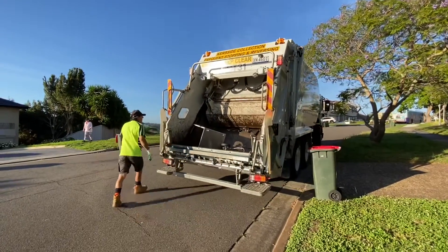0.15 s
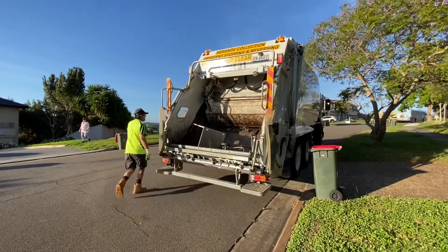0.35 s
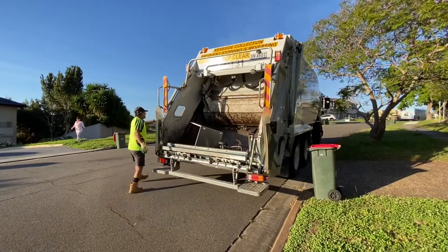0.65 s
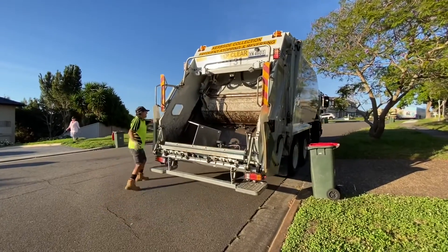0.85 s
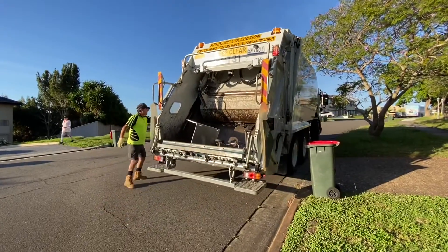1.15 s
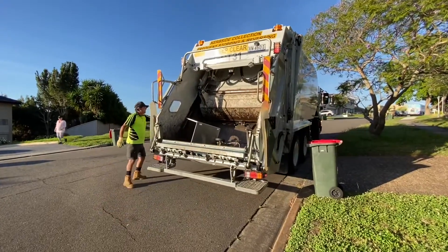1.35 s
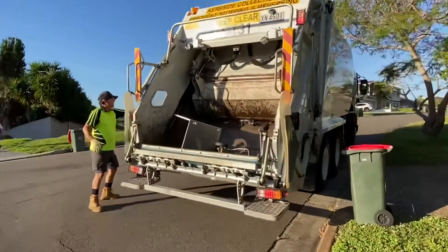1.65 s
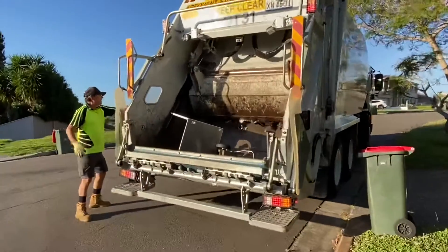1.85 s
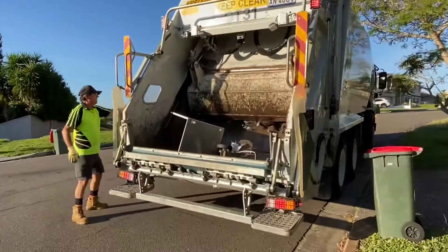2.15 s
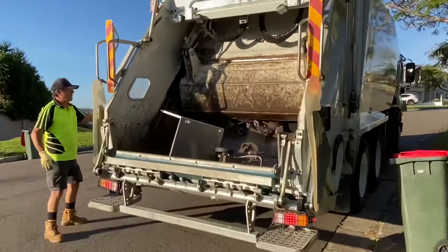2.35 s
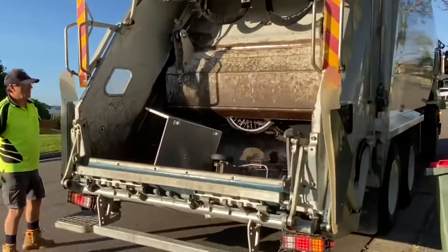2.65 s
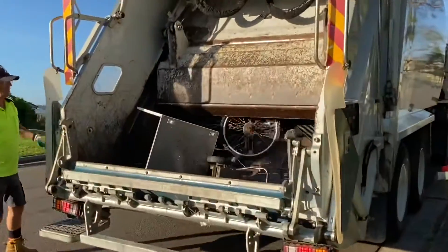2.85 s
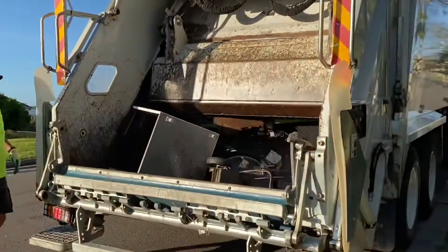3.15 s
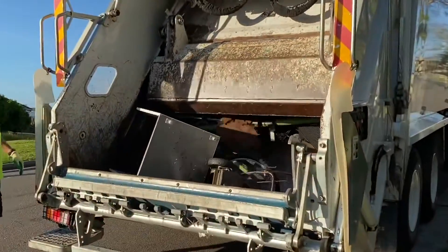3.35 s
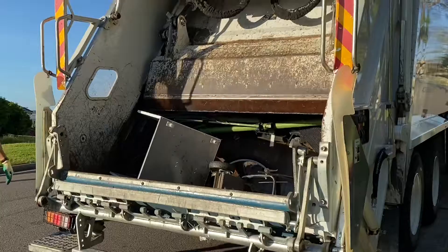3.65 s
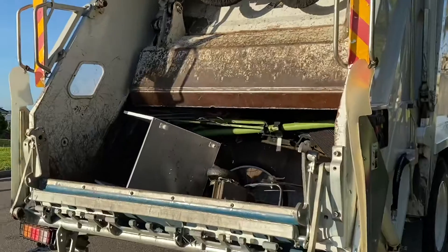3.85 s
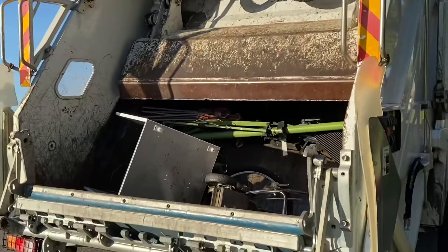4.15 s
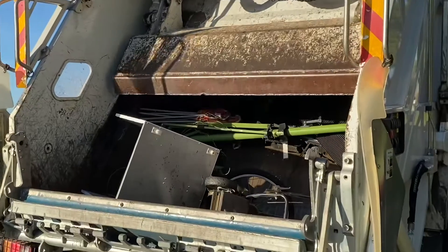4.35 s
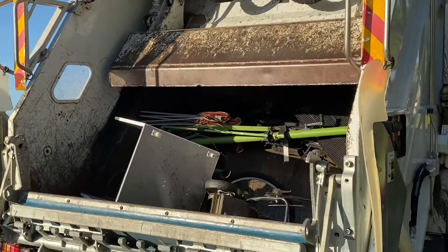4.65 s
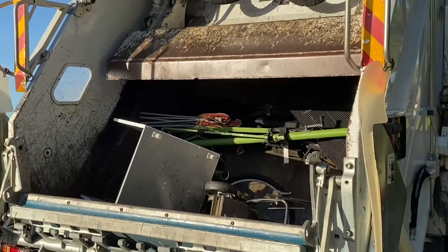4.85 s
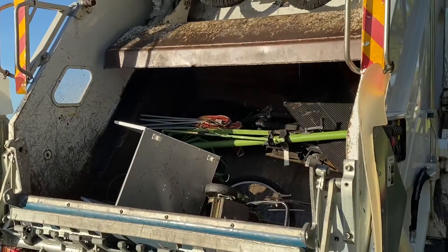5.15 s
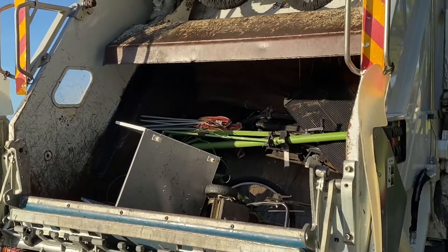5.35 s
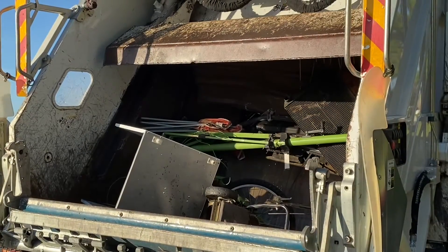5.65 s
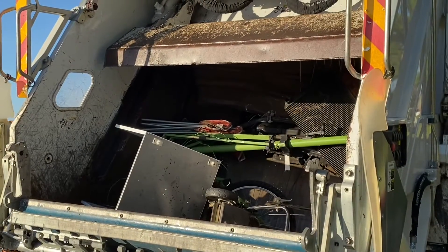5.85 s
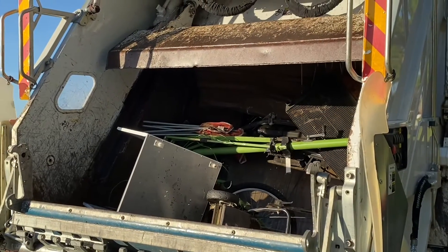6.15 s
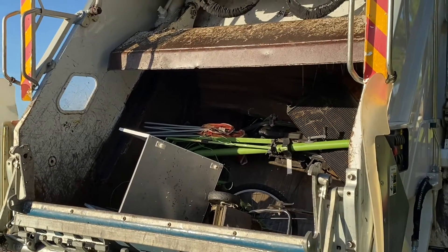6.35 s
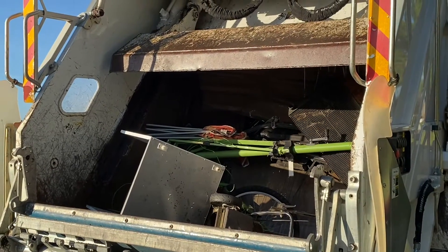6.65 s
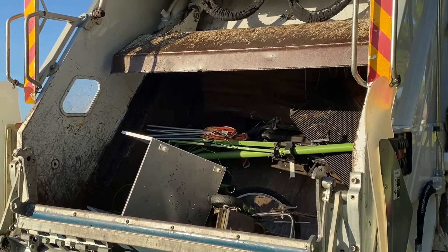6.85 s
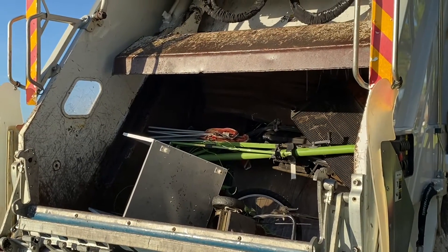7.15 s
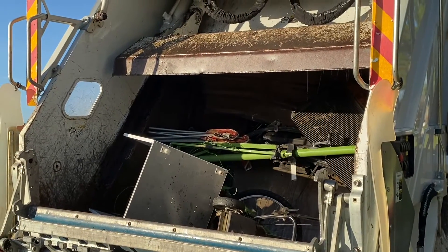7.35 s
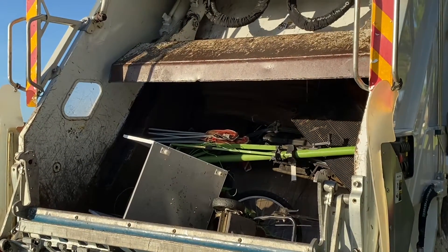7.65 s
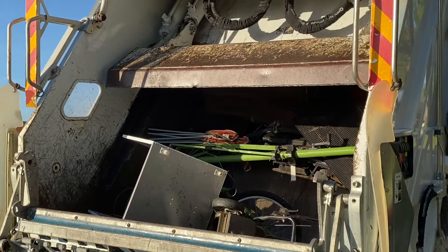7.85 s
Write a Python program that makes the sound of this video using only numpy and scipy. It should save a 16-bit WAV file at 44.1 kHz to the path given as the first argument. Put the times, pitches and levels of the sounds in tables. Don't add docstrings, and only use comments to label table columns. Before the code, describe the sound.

A refuse truck idles at the kerb, its hydraulics load up, and scrap crashes, clangs and rattles in the steel hopper before easing to whine and hiss.

```python
import sys
import numpy as np
from scipy import signal
from scipy.fft import rfft, irfft
from scipy.io import wavfile
from scipy.ndimage import uniform_filter1d

SR = 44100
rng = np.random.default_rng(int(sys.argv[2]) if len(sys.argv) > 2 else 0)


def wav_out(sig):
    wavfile.write(sys.argv[1], SR, np.round(np.clip(np.atleast_2d(sig).T, -1, 1) * 32767).astype(np.int16))


def gain_from_db(level_db):
    decades = np.asarray(level_db, float) / 20
    return 10 ** decades


N = 352800


def in_time(rows):
    s, *columns = np.transpose(rows)
    return [np.interp(np.arange(N) / SR, s, c) for c in columns]


def rms_one(x):
    return x / np.sqrt(np.mean(x ** 2) + 1e-20)


def shaped(x, points, gain=gain_from_db):
    hz, value = np.transpose(points)
    bins = np.arange(1, len(x) // 2 + 2) * SR / len(x)
    curve = np.interp(np.log(bins), np.log(hz), value, left=value[0], right=value[-1])
    return irfft(rfft(x) * gain(curve), len(x))


def band(x, low_hz, high_hz, order=2):
    return signal.sosfilt(signal.butter(order, [low_hz, high_hz], "band", fs=SR, output="sos"), x)


def drift(rate_hz):
    steps = rng.standard_normal(8 * 60 + 3)
    return np.interp(np.arange(N) / SR * min(rate_hz, 60), np.arange(len(steps)), steps) * 1.2


def resonate(x, hz, width_hz):
    r = np.exp(-np.pi * width_hz / SR)
    feedback = [1, -2 * r * np.cos(2 * np.pi * hz / SR), r * r]
    return signal.lfilter(np.array([1, 0, -1]) * (1 - r * r) / 2, feedback, x + 1e-18)


def grains(per_s, spread_db):
    chance = rng.random(N) * SR / per_s
    hit, clicks = chance < 1, np.zeros(N)
    size, sign = np.modf(2 * chance[hit])
    clicks[hit] = gain_from_db(spread_db * np.minimum(-np.log(size + 1e-9), 3.5)) * (2 * sign - 1)
    return rms_one(clicks)


def swell(rise_s, t60_s, size):
    t = np.arange(size) / SR
    return np.minimum(t / rise_s, 1) * gain_from_db(-60 * np.maximum(t - rise_s, 0) / max(t60_s, .02))


def held(start, length, db, rise_s, fall_s):
    t = np.arange(0, N + 64, 64)[:, None] / SR
    early, late = np.maximum(start - t, 0), np.maximum(t - start - length, 0)
    shape = db - 20 * (early / rise_s + late / fall_s)
    total_db = 10 * np.log10(np.sum(gain_from_db(2 * shape), axis=1) + 1e-12)
    return np.interp(np.arange(N) / SR, t[:, 0], total_db)


def add(out, s, x):
    at = round(s * SR)
    out[at:at + len(x)] += x[:len(out) - at]


# t/s, firings per s
SPEED = [(0, 51.15), (1.35, 51.1), (1.6, 43.6), (3.3, 43.1), (5.22, 43.1), (5.4, 44.4), (5.78, 46.2),
         (6.1, 46.4), (7.4, 46.4), (7.65, 43.8), (8, 43.3)]
# t/s, level/dB
EXHAUST = [(0, -41), (1.23, -41), (1.43, -38), (1.56, -44), (1.7, -32), (2.27, -32.5), (2.96, -38),
           (3.88, -39), (4.01, -33.5), (5.28, -33), (5.48, -32.5), (5.61, -41), (5.75, -37), (6.73, -39),
           (7.35, -35), (7.46, -42.5), (7.64, -39), (7.82, -28.5)]
# multiple of firing, level/dB re firing tone
FIRING_ORDERS = [(1.55, -9), (2, -14), (3.331, -18)]
# t/s, level/dB
PUMP = [(0, -51), (1.2, -58), (1.5, -84), (2.4, -39), (3.3, -39), (3.8, -33), (4.6, -31.5), (5.25, -30),
        (5.45, -41.5), (5.6, -48), (5.85, -41.5), (6.4, -47.5), (7.35, -47.5), (7.62, -33), (7.8, -28)]
# t/s, level/dB
NEAR = [(0, -67), (1.5, -62), (3.5, -61), (4.8, -47.5), (5.7, -49.5), (7.5, -44), (7.8, -38)]
# multiple of firing, level/dB re octave line
PUMP_ORDERS = [(12, -12.5), (16, -8)]
# t/s, level/dB
IDLE_LINE = [(0, -50.5), (1.1, -51), (1.5, -62), (8, -91.5)]
# start t/s, length/s, level/dB, multiple of firing
GEAR_LINES = [(4.0, 1.2, -61, 84.5), (4.0, 1.2, -59, 87.0), (3.97, 1.25, -58, 89.3), (4.8, .2, -64, 96.0),
              (4.7, 0.56, -55.5, 16.0), (5.4, 0.22, -58, 32.2), (5.32, 0.26, -62, 57.0),
              (5.75, 1.6, -68, 57.0), (5.9, .45, -67, 48.0), (6.1, 1.4, -55.5, 6.0)]
# f/Hz, width/Hz, level/dB
BODY = [(69.5, 14, 16), (83, 21.6, 17), (100, 25, -18.5)]
# start t/s, length/s, chassis throb level/dB, scrap clang offset/dB
STROKES = [
    (1.555, 1.46, -29, 0.5),
    (7.43, .6, -33, -6.5),
]


def engine():
    (rate,), (tone_db,) = in_time(SPEED), in_time(EXHAUST)
    (pump_db,), (octave_db,), (idle_db,) = in_time(PUMP), in_time(NEAR), in_time(IDLE_LINE)
    turns = np.cumsum(rate * (1 + .002 * drift(7))) / SR

    def line(multiple, db, flutter_db):
        level = np.sqrt(2) * gain_from_db(db + flutter_db * drift(14))
        return level * np.sin(2 * np.pi * (multiple * turns + rng.random()))

    out = line(1, tone_db, 1.2) + line(6, idle_db, 2.2)
    out += sum(line(k, tone_db + db, 4.76) for k, db in FIRING_ORDERS)
    out += line(4, pump_db, 0.32) + line(8, octave_db, 1.9)
    out += sum(line(k, octave_db + db, 2.2) for k, db in PUMP_ORDERS)
    for s, length, db, k in GEAR_LINES:
        out += line(k, held(s, length, db, 0.15, 0.19), 1.8)

    start, length, throb_db, _ = np.transpose(STROKES)
    idle_throb_db, rise_s, fall_s = -42.5, 0.071, 0.62
    shake = np.hypot(gain_from_db(idle_throb_db), gain_from_db(held(start, length, throb_db, rise_s, fall_s)))
    kicks = np.diff(np.floor(turns), prepend=0) * rng.standard_normal(N)
    throb = band(sum(gain_from_db(db) * resonate(kicks, hz, w) for hz, w, db in BODY), 48.0, 163)
    return out + shake * rms_one(throb)


# start t/s, length/s, then level/dB of heavy parts, light parts, fine grit
SLIDES = [(1.575, 0.067, -17.5, -28, -45.5), (1.71, 0.059, -26, -38, -62), (1.784, 0.2, -22.5, -25, -44),
          (2.036, 0.14, -19, -25, -47.5), (2.221, 0.066, -19, -19, -34.5), (2.315, 0.019, -23.5, -19, -30),
          (2.373, 0.04, -17.5, -22, -52), (2.498, 0.07, -18.5, -16, -36.5), (2.592, 0.035, -16.5, -14, -37),
          (2.659, 0.016, -12, -35, -58), (2.699, 0.033, -17.5, -16.5, -35.5),
          (2.738, 0.096, -20, -17.5, -42), (2.849, 0.014, -21.5, -13, -38), (2.877, 0.013, -15, -15.5, -46),
          (3.016, 0.072, -14.5, -15.5, -46), (3.133, 0.1, -22.5, -17.5, -44),
          (3.223, 0.022, -26, -18.5, -42), (3.526, 0.031, -46, -31, -46.5), (7.43, .015, -19.5, -29, -61),
          (7.446, 0.024, -21, -24, -47.5), (7.553, 0.13, -31, -36, -65), (7.676, 0.064, -27.5, -43, -68),
          (7.79, 0.086, -27.5, -42, -62), (7.946, .07, -29, -41.5, -60)]
# f/Hz, width/Hz, level/dB
HOPPER = [(140.6, 8.5, -0.5), (172, 6.1, -2.5), (208, 7.4, -3.5), (235.5, 11.6, 0.5), (277.3, 12.5, 2),
          (305, 35, 2), (348, 35, 3.5), (380, 24, -2.5), (435, 41, 3.5), (465, 16.3, -4.5), (510, 49, 2),
          (567, 34, -3)]
# f/Hz, width/Hz, level/dB
RIBS = [(676, 65, 0), (730, 89, 1.5), (809, 77, 5.5), (900, 91, 3.5), (965, 16, -1), (1066, 89, 3),
        (1206, 92, 0), (1302, 33, -3), (1520, 140, -16.5)]
# f/Hz, level/dB per Hz
SCRAP = [(1300, 0.5), (1800, -1.5), (3000, -1.5), (4500, -4.5), (6000, -10), (8000, -12.5), (9500, -30)]


def tumbling_scrap():
    start, length, heavy_db, light_db, fine_db = np.transpose(SLIDES)
    rise_s = 0.02
    boom_db = held(start, length, heavy_db, rise_s, 0.2)
    rattle_db = held(start, length, light_db, rise_s, 0.16)
    grit_db = held(start, length, fine_db, rise_s, .1)
    dull_db, = in_time([(s + end, db) for s, span, _, db in STROKES for end in (0, span)])
    clang_db = -26.5 + 0.55 * (boom_db + 19) + 0.25 * (rattle_db + 19.0) + dull_db

    def ring(modes, per_s, widen):
        return rms_one(sum(gain_from_db(db) * resonate(grains(per_s, 3.43), hz, widen * w) / np.sqrt(w)
                           for hz, w, db in modes))

    boom = band(ring(HOPPER, 200, 1.0), 64, 735)
    clang = band(ring(RIBS, 250, 0.96), 530, 3700)
    clumps = gain_from_db(3.1 * drift(45))
    pings = sum(gain_from_db(2.2 * drift(25)) * resonate(grains(300, 2.8), hz, hz / 30)
                for hz in np.geomspace(1400, 7400, 24))
    clatter = grains(1600, 4.4) * clumps + 0.72 * rms_one(pings)
    rattle = rms_one(shaped(clatter, [(600, -44)] + SCRAP))
    grit = rms_one(band(grains(2000, 3.2) * clumps, 7500, 15500, order=4))
    out = gain_from_db(boom_db - 3.5) * boom + gain_from_db(clang_db) * clang
    return out + gain_from_db(rattle_db - 7.5) * rattle + gain_from_db(grit_db + 6) * grit


# t/s, peak level/dB, struck part f/Hz, thud level/dB re blow
BLOWS = [(0.286, -41.5, 4740, -10), (1.3273, -46, 2930, 5), (1.563, -30, 6500, -6), (1.629, -20.5, 2450, 0),
         (1.8325, -23, 2330, -16), (2.218, -26, 2250, 3), (2.3226, -8, 3330, -19), (2.341, -6, 2960, -2.5),
         (2.376, -11.5, 3450, 0), (2.4957, -9.5, 3620, 0.5), (2.61, -11, 2920, -3.5),
         (2.692, -13, 2510, -18), (2.81, -9, 3470, -9), (2.844, -15, 4000, -6), (2.8738, -8.5, 2310, -31),
         (3.021, -10, 3230, 3.5), (3.064, -14.5, 2300, 11), (3.1046, -10.5, 3100, -1),
         (3.19, -10.5, 4880, -23), (3.2614, -8.5, 3320, -1), (3.53, -22, 3400, -5), (3.783, -20, 2800, -4),
         (4.08, -36, 4140, 3), (4.627, -23, 3460, -17), (4.633, -5, 4050, -6.5), (4.7693, -26.5, 2380, -6),
         (5.437, -45, 3480, -22), (7.376, -36.5, 2290, -18), (7.42, -11.5, 3500, -12),
         (7.538, -24, 3260, -18)]


def blows():
    out, size = np.zeros(N), SR // 4
    t = np.arange(size) / SR
    for (s, db, hz, thud_db), seed in zip(BLOWS, rng.standard_normal((len(BLOWS), 4, size))):
        dulling_db = 13 * (s > STROKES[-1][0] - .1)
        colour = [(1000, -30), (hz / 1.63, -8), (hz, 0), (hz * 1.3, -7),
                  (9000, -13.0 - dulling_db), (10500, -50)]
        crack = rms_one(shaped(seed[0] ** 3, colour))
        spread = np.clip(seed[2, :16], -2, 1.2)
        rings = sum(np.sin(2 * np.pi * (hz * 1.4 ** z * t + z * 9)) for z in spread) / np.sqrt(8)
        thud = rms_one(band(seed[1], 540, 1320))
        edge = rms_one(band(seed[3] ** 3, 4000, 14400, order=4))
        blow = crack + 0.27 * rings + gain_from_db(thud_db) * thud + gain_from_db(-8.5 - dulling_db) * edge
        add(out, s, gain_from_db(db - 11) * swell(0.0042, 0.18, size) * blow)
    return out


# t/s, level/dB, f/Hz
PLATE_KNOCKS = [(1.561, -22, 259), (1.574, -18.5, 334), (1.621, -21, 279), (1.665, -17, 365),
                (1.673, -16, 443), (1.721, -23, 318), (1.896, -22.5, 380), (1.901, -23.5, 280),
                (1.991, -23.5, 360), (2.046, -20.5, 331), (2.081, -20.5, 343), (2.137, -21.5, 450),
                (2.139, -23.5, 280), (2.229, -16.5, 466.6), (2.235, -14, 356), (2.285, -20, 335),
                (2.349, -20.5, 410), (2.393, -13, 338), (2.396, -17, 219), (2.461, -21, 322),
                (2.494, -13, 349), (2.514, -21, 255), (2.534, -19, 355), (2.57, -19, 380),
                (2.575, -22, 204), (2.618, -17, 371), (2.631, -17, 194), (2.658, -16.5, 456),
                (2.666, -13.5, 222), (2.691, -10, 224), (2.764, -17.5, 228), (2.783, -25.5, 361),
                (2.814, -20, 225), (2.889, -11.5, 312), (2.904, -11.5, 205), (2.966, -20.5, 369),
                (2.975, -21, 237), (3.016, -22, 310), (3.018, -19, 419), (3.044, -20.5, 354),
                (3.071, -22, 333), (3.075, -18.5, 207), (3.123, -23, 352), (3.126, -24.5, 185),
                (3.159, -26, 195), (3.178, -21.5, 337), (3.195, -22.5, 214), (3.223, -21, 307),
                (3.271, -22, 308), (7.44, -18.5, 227), (7.443, -19, 322), (7.562, -22.5, 247),
                (7.676, -25.5, 163), (7.746, -31, 172), (7.754, -23.5, 366), (7.823, -23.5, 348),
                (7.865, -25.5, 361), (7.908, -29, 172), (7.91, -31, 345), (7.958, -27.5, 358)]
# t/s, level/dB, f/Hz
RIB_KNOCKS = [(1.582, -23.5, 887), (1.829, -28, 842), (1.836, -29, 693), (1.884, -27, 896),
              (1.894, -31, 741), (2.015, -35, 848), (2.131, -23, 923), (2.134, -27, 754),
              (2.138, -25, 1115), (2.218, -25, 574), (2.262, -32, 1330), (2.263, -25, 947),
              (2.372, -27, 864), (2.413, -30, 748), (2.494, -19.5, 830), (2.498, -28, 1334),
              (2.549, -23, 947), (2.556, -22, 520), (2.568, -22, 1050), (2.627, -22.5, 814),
              (2.652, -23, 585), (2.669, -26, 770), (2.762, -25.5, 830), (2.865, -33, 772),
              (2.878, -26, 689), (3.016, -24.5, 805), (3.024, -23, 574), (3.025, -21, 682),
              (3.058, -23, 1580), (3.058, -24, 943), (3.061, -26, 1373), (3.061, -24, 1072),
              (3.14, -20.5, 652), (3.186, -28, 1020), (3.246, -26.5, 653), (3.27, -25, 736),
              (3.571, -38.5, 620), (3.787, -40, 704), (7.44, -31.5, 787), (1.559, -31, 950)]
# t/s, level/dB, f/Hz
PINGS = [(2.318, -26, 6700), (2.321, -26, 3780), (2.337, -21, 2464), (2.338, -24, 3060),
         (2.34, -18.5, 1715), (2.34, -24, 4080), (2.353, -24, 3290), (2.494, -25, 3610), (2.496, -28, 4113),
         (2.499, -27, 2530), (2.505, -31, 5340), (2.509, -29, 3220), (2.605, -21.5, 2885),
         (2.606, -26, 5954), (2.61, -27, 3456), (2.618, -23, 4470), (2.621, -26, 1852), (2.688, -29, 7300),
         (2.698, -26, 2500), (2.763, -26, 1760), (2.808, -29, 3440), (2.811, -30, 4587), (2.822, -29, 7483),
         (2.868, -22, 2562), (2.869, -20, 3898), (2.871, -24, 2960), (2.871, -18, 2300), (2.873, -25, 3390),
         (3.017, -31, 4240), (3.02, -32, 2310), (3.019, -31, 3300), (3.058, -25, 2960), (3.062, -21, 2410),
         (3.1, -23.5, 4160), (3.189, -27, 4867), (3.225, -25, 5150), (3.258, -23, 3330), (3.26, -30, 5100),
         (3.26, -28, 6406), (3.26, -24, 3000), (3.261, -26, 4264), (3.273, -28, 3736), (3.274, -26, 2390),
         (3.512, -34, 3350), (3.784, -36, 2870), (3.783, -36, 2400), (7.422, -37, 4530), (7.422, -32, 3630),
         (7.439, -33, 4231)]
# gain/dB, rise/s, t60/s
KNOCK_RULES = [
    (4.0, 0.00564, 0.13),
    (4, 0.005306, 0.16),
    (5.5, 0.002003, 0.06),
]


def knocks():
    out, size = np.zeros(N), SR // 3
    t = np.arange(size) / SR
    for rows, (gain_db, rise_s, t60_s) in zip((PLATE_KNOCKS, RIB_KNOCKS, PINGS), KNOCK_RULES):
        for (s, db, hz), z in zip(rows, rng.standard_normal((len(rows), 2))):
            twin_hz = hz * (1 + 0.0505 * z[0])
            tone = np.sin(2 * np.pi * hz * t) + 0.52 * np.sin(2 * np.pi * twin_hz * t + 9 * z[1])
            add(out, s + .0048 - rise_s, gain_from_db(db + gain_db) * swell(rise_s, t60_s, size) * tone)
    return out


# f/Hz, level/dB, t60/s
BAR_MODES = [(870, -4, 0.25), (1118, -4, 0.12), (2450, -9, 0.21), (2638, -12, 0.11), (3240, 2.5, 0.15),
             (3760, 2, 0.077), (4340, 2, 0.091), (4130, -6, 0.16), (5320, -4, 0.12), (6060, -2, 0.1),
             (6514, -17, 0.21), (6940, -3, 0.095), (6993, -8, 0.11), (7720, -26, 0.32)]


def dropped_bar():
    out, size = np.zeros(N), SR // 3
    drop_s, drop_db = 4.636, -23
    t = np.arange(size) / SR
    for (hz, db, t60_s), phase in zip(BAR_MODES, rng.random(len(BAR_MODES))):
        tone = np.sin(2 * np.pi * (hz * t + phase))
        add(out, drop_s, gain_from_db(drop_db + db) * swell(0.0034, t60_s, size) * tone)
    return out


# t/s, peak level/dB, f/Hz, second mode f/Hz, t60/s
BOOMS = [
    (2.496, -6, 142.5, 345, 0.081),
    (3.549, -20.5, 172, 312, 0.26),
    (4.636, -13, 172, 333, 0.051),
    (7.489, -11.5, 182, 431, 0.24),
]
# t/s, level/dB, f/Hz, rise/s, t60/s
SHUDDERS = [
    (1.42, -19, 80.0, 0.125, 0.25),
    (1.57, -21, 100, 0.03, 0.25),
    (5.521, -29, 60.5, 0.023, 0.11),
    (7.471, -11.5, 59.6, 0.015, 0.3),
    (7.563, -13, 66, 0.012, 0.09),
]


def heavy_steel():
    out, t = np.zeros(N), np.arange(SR) / SR
    for s, db, hz, upper_hz, t60_s in BOOMS:
        tone = np.sin(2 * np.pi * hz * t) + 0.84 * np.sin(2 * np.pi * upper_hz * t)
        add(out, s, gain_from_db(db - 10.0) * swell(0.0013, t60_s, SR) * tone)
    stiffen = 0.32
    for s, db, hz, rise_s, t60_s in SHUDDERS:
        bent_t = t - rise_s * stiffen * (1 - np.exp(-t / rise_s))
        add(out, s, gain_from_db(db) * swell(rise_s, t60_s, SR) * np.sin(2 * np.pi * hz * bent_t))
    return out


# t/s, level/dB
FLOW = [(0, -64), (1.3, -65.5), (1.55, -57.5), (1.62, -40), (3.3, -38), (3.6, -41.5), (3.9, -44.5),
        (4.3, -47.5), (4.8, -47), (5.2, -48.5), (5.35, -53.5), (5.55, -60), (5.9, -61), (6.9, -56.5),
        (7.4, -53.5), (7.5, -40), (8, -46)]
# f/Hz, level/dB per Hz
GROWL = [(110, 5.5), (200, 2), (320, 1.5), (450, -0.5), (600, -10), (800, -5.5), (1100, -16), (1500, -16),
         (2000, -67)]
# f/Hz, level/dB per Hz
OIL = [(1000, -45), (1700, 1.5), (2600, 1), (4000, -1.5), (6000, -6.5), (8000, -14), (10000, -18.5)]
# f/Hz, level/dB per Hz
AIR = [(2500, -34), (5000, -13), (9000, -9.5), (13000, -17), (16000, -13)]


def hydraulic_flow():
    out, (oil_db,) = np.zeros(N), in_time(FLOW)
    over_db = oil_db + 45
    growl_db, air_db = -38 + 0.48 * over_db, -53 + 1.8 * over_db
    for db, colour in zip((growl_db, oil_db, air_db), (GROWL, OIL, AIR)):
        noise = shaped(rng.standard_normal(N), [(colour[0][0] / 2, -60)] + colour)
        out += gain_from_db(db + 1.15 * drift(13)) * rms_one(noise)
    return out


# start t/s, length/s, level/dB, f/Hz, width/Hz
WHISTLES = [(3.98, 1.27, -53.5, 3860, 580), (4.8, 0.52, -62, 2700, 200), (5.75, 1.6, -63, 2580, 330),
            (4.3, 0.98, -61, 2990, 130), (4.4, 0.23, -53, 7750, 60), (7.82, .3, -39, 760, 16.5),
            (7.75, .3, -44.5, 1350, 690)]
# start t/s, length/s, level/dB, f/Hz, width/Hz
SQUEALS = [(1.36, 0.14, -58, 3800, 480), (2.07, 0.026, -55, 7890, 60), (2.535, 0.057, -23.5, 7910, 66),
           (2.8, 0.073, -35, 7720, 60), (3.515, 0.04, -37, 3340, 220), (2.7, .03, -38, 8200, 90),
           (3.28, 0.024, -46, 7750, 69), (2.86, .07, -47, 14500, 120), (3.22, .04, -44, 14300, 150)]


def whistles_and_squeals():
    out, noise = np.zeros(N), rng.standard_normal(N)
    for rows, rise_s, fall_s in (WHISTLES, 0.15, 0.19), (SQUEALS, 0.025, 0.091):
        for start, length, db, hz, width_hz in rows:
            tone = resonate(resonate(noise, hz, width_hz), hz, width_hz)
            level_db = held(start, length, db, rise_s, fall_s) + 1.4 * drift(8.2)
            out += gain_from_db(level_db) * rms_one(tone)
    return out


# t/s, level/dB, rise/s, t60/s, tilt/dB per octave
VENTS = [
    (.28, -48.5, .006, 0.098, -3),
    (1.385, -43, .01, 0.23, -1),
    (5.47, -42.5, 0.01, 0.092, -4),
    (6.94, -40, 0.046, 1.96, -3.5),
]
# f/Hz, level/dB per Hz
JET = [(1500, -14), (2500, -4), (5000, -2.5), (9000, 3), (12000, 4.5), (16000, 8)]


def vents():
    out = np.zeros(N)
    for s, db, rise_s, t60_s, tilt_db in VENTS:
        colour = [(hz, level + tilt_db * np.log2(hz / 5000)) for hz, level in JET]
        jet = rms_one(shaped(rng.standard_normal(SR), [(700, -60)] + colour))
        add(out, s, gain_from_db(db) * swell(rise_s, t60_s, SR) * jet)
    return out


# t/s, level/dB
STREET_LEVEL = [(0, -55), (1, -55), (1.6, -58), (8, -64)]
# f/Hz, level/dB per Hz
STREET = [(300, -25.5), (600, -33), (1050, 4.5), (1400, -6.5), (1600, -12), (2200, -7.5), (3000, -15.5),
          (6000, -25), (12000, -30.5), (15000, -40)]


def street():
    noise = rms_one(shaped(rng.standard_normal(N), [(150, -54)] + STREET))
    return gain_from_db(in_time(STREET_LEVEL)[0] + 2.2 * drift(5.5)) * noise


# t/s, lean to the left 0-1, diffuse level/dB below 2 kHz, diffuse level/dB above
PICKUP = [(0, .02, -6, 2), (1.1, 0.2, -6, 1), (1.6, 1.1, -2, -1.5), (2.6, 1, -11, -8.5),
          (2.82, 0.75, -17, -19.5), (2.9, 0.71, -17, -56), (4.5, 0.57, -14, -66), (8, 0.57, -14, -72)]
# f/Hz, side share
LEAN = [(60, 0.036), (110, 0.21), (200, 0.63), (400, 0.41), (1300, 0.56), (1900, 0.31), (2400, 0.028),
        (8000, 0.0082)]


def microphone_pair(mid):
    lean, low_db, high_db = in_time(PICKUP)
    scatter = rng.standard_normal(2048) * gain_from_db(-60 * np.arange(2048) / SR / 0.12)
    diffuse = signal.fftconvolve(mid, scatter / np.linalg.norm(scatter))[:N]
    diffuse = np.real(signal.hilbert(diffuse) * np.exp(3j * drift(8)))
    low_colour = [(50, 1), (130, 1.5), (300, -6.5), (700, 0), (1500, 8), (2000, -30), (2300, -38.0)]
    side = lean * shaped(mid, LEAN, gain=np.asarray)
    side += gain_from_db(low_db) * shaped(diffuse, low_colour)
    side += gain_from_db(high_db) * band(diffuse + 0.81 * lean * mid, 1220, 12400, order=4)
    return np.array([mid + side, mid - side])


def scene():
    mid = engine() + tumbling_scrap() + blows() + knocks() + dropped_bar() + heavy_steel()
    mid += hydraulic_flow() + whistles_and_squeals() + vents() + street()
    return microphone_pair(mid)


def roll_off(x):
    return signal.sosfilt(signal.butter(12, 16780, fs=SR, output="sos"), x)


def record(dry):
    lag_samples, treble_hz, cutoff_hz, side_top_hz = 9.87, 7700, 15800, 14450
    wide_until_s, wide_treble_hz = 2.05, 8800
    hz, s, (left, right) = signal.stft(1.05 * np.tanh(dry / 1.05), SR, nperseg=2048)
    hz = hz[:, None]
    mid, side = (left + right) / 2, (left - right) / 2

    size = abs(mid)
    near_size = uniform_filter1d(size, size=32, axis=0)
    kept = mid * (size > gain_from_db(-106)) * (size > .6 * (hz > 9000) * near_size)

    late = np.exp(-2j * np.pi * hz * lag_samples / SR)
    limit = .39 + .13 * np.repeat(rng.standard_normal((65, mid.shape[1])), 16, axis=0)[:len(hz)]
    mid_share, side_share = (1 - late) / 2, (-1 - late) / 2
    top_mid = mid_share * (abs(mid_share) > limit) * kept
    top_side = side_share * (abs(side_share) > 1.3 * limit) * kept

    top = hz > np.where(s < wide_until_s, wide_treble_hz, treble_hz)
    mid = np.where(top, top_mid, mid)
    side = np.where(top, top_side * (hz < side_top_hz), side * ((hz < 6500) | (s < 2.35)))
    pair = np.array([mid + side, mid - side]) * (hz < cutoff_hz)
    return roll_off(signal.istft(pair, SR, nperseg=2048)[1][:, :N])


dry = scene()
out = record(dry)
wav_out(out)
```